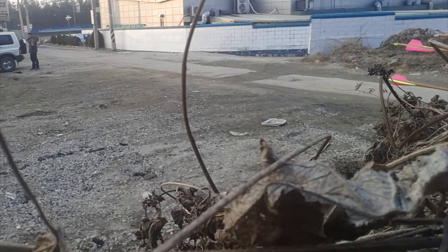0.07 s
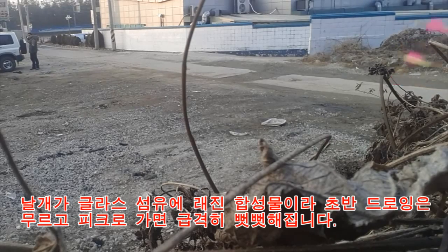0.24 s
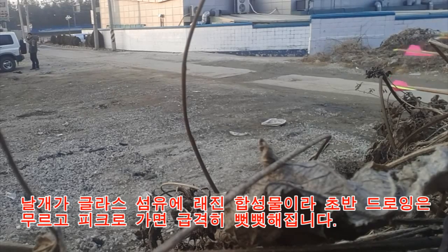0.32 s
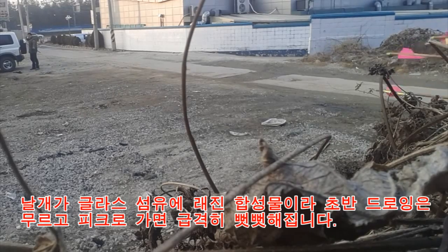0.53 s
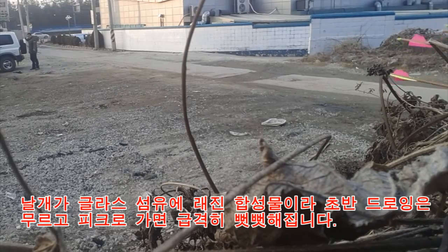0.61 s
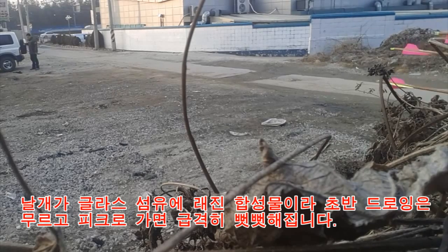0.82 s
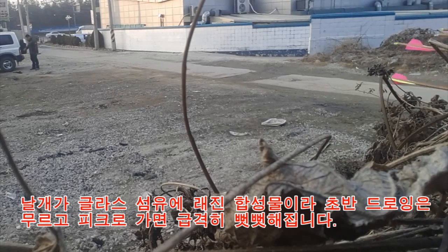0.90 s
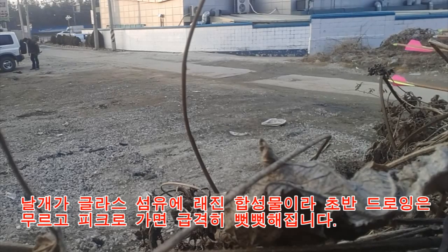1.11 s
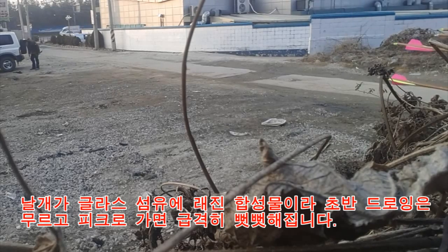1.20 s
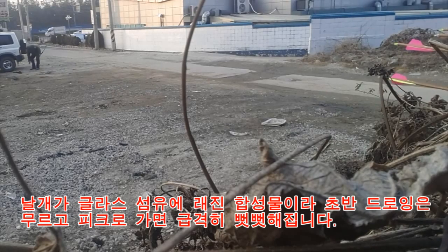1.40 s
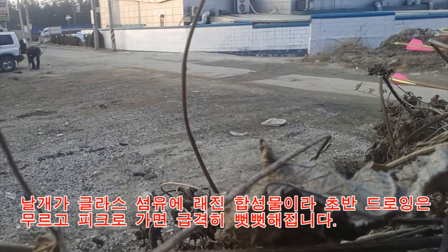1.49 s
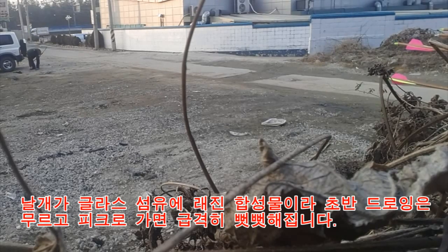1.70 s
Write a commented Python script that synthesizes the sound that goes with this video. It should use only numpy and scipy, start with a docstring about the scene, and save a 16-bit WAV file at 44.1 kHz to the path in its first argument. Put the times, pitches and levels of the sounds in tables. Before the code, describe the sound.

An arrow smacks into a target with a sharp loud crack and short thud outdoors

```python
"""An arrow strikes a target pile near the stereo microphone, in an open gravel yard.
Its contacts are noise bursts with the ringing modes of the shaft; the pile thuds in modes of its own.
Before the hit the fletching hisses louder; after it, ground and walls return scattered noise and slaps.
Late on come faint ticks in a rustle. Behind it all lie distant traffic, in three bands of noise,
and a thin, wavering whine."""
import sys
import numpy as np
from scipy import signal
from scipy.fft import rfft, irfft
from scipy.io import wavfile

SR = 44100
rng = np.random.default_rng(int(sys.argv[2]) if len(sys.argv) > 2 else 0)


def generate_wav(sig):
    """Save sig (samples, or channels by samples) to the path in sys.argv[1] as 16-bit PCM at SR."""
    pcm = np.round(np.clip(np.atleast_2d(sig).T, -1, 1) * 32767).astype(np.int16)
    wavfile.write(sys.argv[1], SR, pcm)


N = 77175  # samples, 1.75 s


def undb(db):
    """Decibels to gain."""
    return 10 ** (np.asarray(db) / 20)


def unit(x):
    """Scale to rms 1."""
    return x / np.sqrt(np.mean(x ** 2))


def since(start_s):
    """Seconds since a moment."""
    return np.arange(N) / SR - start_s


PORT_LAG_S = 0.00028


def ports(start_s):
    """Time since an event at each microphone port; the right one hears it later."""
    return np.array([since(start_s), since(start_s + PORT_LAG_S)])


def pan(db):
    """Left and right gains that differ by db, positive to the left."""
    return undb(np.array([[db], [-db]]) / 2)


def fade(t, t60):
    """Free decay by 60 dB in t60 from t = 0, silent before."""
    decay = np.exp(-np.log(1000) * np.clip(t / max(t60, 1e-4), 0, 10))
    return (t >= 0) * decay


def swell(t, rise_s, t60):
    """Exponential rise up to t = 0, then free decay."""
    rise = np.exp(np.minimum(t, 0) / max(rise_s, 1e-4))
    return np.where(t < 0, rise, fade(t, t60))


def onset(t, rise_s):
    """Straight rise from 0 to 1 that starts at t = 0."""
    return np.clip(t / rise_s, 0, 1)


def colour(x, points, share=1):
    """Filter by (Hz, dB) points on a log-frequency axis; share scales the decibels."""
    hz, db = np.array(points).T
    f = np.maximum(np.fft.rfftfreq(2 * N, 1 / SR), 1)
    gain = undb(share * np.interp(np.log(f), np.log(hz), db))
    return irfft(rfft(x, 2 * N) * gain)[..., :N]


def ring(t, modes):
    """Damped modes struck at t = 0, each cut off after two decay times."""
    out = np.zeros(t.shape)
    for hz, db, t60 in modes:
        live = (t >= 0) & (t < 2 * t60)
        out[live] += undb(db) * np.cos(2 * np.pi * hz * t[live]) * fade(t[live], t60)
    return out


CRACK_RISE_S = 0.00017


def burst(t, t60, hz, octaves, size=2048):
    """A short decaying crunch of noise about a centre frequency, separate at each port."""
    f = np.maximum(np.fft.rfftfreq(size, 1 / SR), 1)
    band = np.exp(-0.5 * (np.log2(f / hz) / octaves) ** 2)
    noise = irfft(rfft(rng.standard_normal((2, size))) * band, size)
    out = np.zeros(t.shape)
    for port in range(2):
        live = np.flatnonzero(t[port] >= 0)[:size]
        shape = onset(t[port, live], CRACK_RISE_S) * fade(t[port, live], t60)
        crunch = shape * noise[port]
        # the crunch gets the energy of its envelope
        out[port, live] = crunch * np.linalg.norm(shape) / np.linalg.norm(crunch)
    return out


def walk(rate, count=64):
    """Slow random drift of rms 1, through `rate` random points a second."""
    return unit(np.interp(since(0) * rate, np.arange(count), rng.standard_normal(count)))


# left over right for sound from the target: pitch_hz, left_minus_right_db
YARD_PAN = [(300, 10.5), (2000, 0), (4400, 6), (6200, 12), (8500, -4), (13000, -3.5)]


def lean(x):
    """Sound from the target reaches the two ports with different colours."""
    left = colour(x[0], YARD_PAN, share=1 / 2)
    right = colour(x[1], YARD_PAN, share=-1 / 2)
    return np.array([left, right])


# relative noise spectrum of distant engine rumble: pitch_hz, level_db (per Hz)
RUMBLE = [(20, -3), (35, -46.5), (55, -4.5), (100, -3), (150, -4), (220, -6.5), (330, -15.5), (600, -23.5),
          (1500, -48)]
# relative noise spectrum of road noise: pitch_hz, level_db (per Hz)
ROAD = [(100, -29), (300, 0), (550, -3.5), (900, -0.5), (1300, -6), (2000, -9.5), (3200, -17.5),
        (6000, -28.5), (14000, -35)]
# relative noise spectrum of the thin hiss: pitch_hz, level_db (per Hz)
AIR = [(1000, 0.5), (3000, -15), (5800, 1), (7000, -4), (8400, -7.5), (11000, -14.5), (14500, -12.5)]
# course of the background before panning: time_s, rumble_db, road_db, air_db
LEVELS = [(0, -45.5, -48.5, -59.5), (.2, -47, -52, -54), (.45, -52, -55, -56.5),
          (0.682, -51.5, -54.5, -55.5), (.86, -54, -58, -64), (1.0, -52.5, -55.5, -61.5),
          (1.12, -49.5, -52, -61), (1.3, -45, -49.5, -62.5), (1.54, -44.5, -48, -61.5),
          (1.61, -49.5, -46.5, -60.5), (1.69, -45, -45, -60), (1.75, -41.5, -45.5, -62)]
# stereo width of the background: pitch_hz, side_over_mid_db
WIDTH = [(100, -23), (200, -18), (380, -8), (700, -5.5), (1300, -2.5), (2500, 0.5), (14000, 0)]
TRAFFIC_PAN_DB = 1.4


def traffic():
    """Engine rumble, road noise and thin hiss; the bass is nearly alike left and right."""
    times, *levels = np.array(LEVELS).T
    out = 0
    for spectrum, db in zip((RUMBLE, ROAD, AIR), levels):
        mid, side = colour(rng.standard_normal((2, N)), spectrum)
        side = colour(side, WIDTH)
        stereo = unit(np.array([mid + side, mid - side]))
        out = out + stereo * undb(np.interp(since(0), times, db))
    return out * pan(TRAFFIC_PAN_DB)


WHINE_HZ, WHINE_WAVER_RMS_HZ, FLUTTER_CUTOFF_HZ = 7720, 70.4, 120
FLUTTER_END_DB, WHINE_DB_PER_S = -67, 10  # flutter level at the end, steady growth


def whine():
    """A thin tone, drifting in pitch and fluttering with slow noise, that steadily grows."""
    phase = 2 * np.pi * np.cumsum(WHINE_HZ + WHINE_WAVER_RMS_HZ * walk(12)) / SR
    slow = signal.butter(2, FLUTTER_CUTOFF_HZ, fs=SR, output="sos")
    flutter = unit(signal.sosfilt(slow, rng.standard_normal((2, N))))
    return flutter * np.sin(phase) * undb(FLUTTER_END_DB + WHINE_DB_PER_S * since(N / SR))


# small ticks, levels before panning: start_s, level_db, pitch_hz, t60_s
TICKS = [(0.9282, -50, 6650, .01), (0.938, -51, 6800, .012), (0.9440, -35.5, 5680, .011),
         (0.9687, -50, 5940, 0.0112)]
TICK_PAN_DB, TICK_RISE_S = 11, 0.00088
TICK_RUSTLE_DB, TICK_RUSTLE_RISE_S, TICK_RUSTLE_T60_S = -62, 0.097, 0.1


def ticks():
    """Light, high damped tones in a faint rustle that peaks at the last tick."""
    taps = 0
    for start_s, db, hz, t60 in TICKS:
        t = ports(start_s)
        taps = taps + ring(t, [(hz, db, t60)]) * onset(t, TICK_RISE_S)
    rustle_shape = swell(since(TICKS[-1][0]), TICK_RUSTLE_RISE_S, TICK_RUSTLE_T60_S)
    rustle = scatter(undb(TICK_RUSTLE_DB) * rustle_shape, FLETCH)
    return pan(TICK_PAN_DB) * (taps + rustle)


YARD_GRAIN_DB = 2.2  # spread of the unevenness before colouring


def scatter(envelope, tone):
    """Dense, uneven noise that is silent until the hit, then follows the envelope."""
    steps_db = YARD_GRAIN_DB * np.repeat(rng.standard_normal(N // 128 + 1), 128)[:N]
    noise = rng.standard_normal((2, N)) * undb(steps_db)
    return unit(colour(noise, tone)) * envelope * (since(HIT_S) > 0)


# clusters from ground and walls, levels before the lean: peak_s, level_db, rise_s, t60_s
ECHOES = [(0.238, -30.5, 0.016, 0.2), (0.255, -38, 0.06, 0.72), (0.329, -37.5, 0.012, 0.17),
          (0.374, -43, .01, 0.19), (0.44, -44, 0.018, 0.062), (0.592, -43, 0.0096, 0.17),
          (0.629, -46, 0.08, 0.26), (0.745, -56.5, 0.092, 0.34)]
# relative tone of the clusters: pitch_hz, level_db
YARD = [(150, -19), (400, -3.5), (900, -2.5), (1500, -12.5), (2200, -10), (3300, -4.5), (4100, -6),
        (4500, -6), (5100, -3), (5850, -1), (6100, -2), (6380, -2), (6900, -1.5), (8500, -5.5),
        (10000, -11.5), (14000, -18)]
# sharp returns from single hard surfaces, before the lean: start_s, level_db, t60_s, pitch_hz
SLAPS = [(0.3324, -35.5, 0.027, 1390), (0.352, -40.5, 0.033, 1830), (0.3707, -38, 0.014, 4430),
         (0.4, -40, .012, 5500), (0.548, -45, 0.016, 5530), (0.5905, -40.5, .02, 2760),
         (0.652, -48, 0.017, 5500)]
SLAP_OCTAVES = 0.5
# relative tone of the returning thud: pitch_hz, level_db
THUD_ECHO = [(90, -22), (140, -9), (210, 5), (300, -6), (380, 2.5), (480, -9), (800, -14), (1500, -32)]
THUD_ECHO_S, THUD_ECHO_DB, THUD_ECHO_RISE_S, THUD_ECHO_T60_S = 0.343, -42, 0.022, 0.29


def yard():
    """Gravel and walls return the crack in clusters and single slaps; the thud comes back once."""
    power = sum((undb(db) * swell(since(s), rise, t60)) ** 2 for s, db, rise, t60 in ECHOES)
    slaps = sum(undb(db) * burst(ports(s), t60, hz, SLAP_OCTAVES) for s, db, t60, hz in SLAPS)
    thud_shape = swell(since(THUD_ECHO_S), THUD_ECHO_RISE_S, THUD_ECHO_T60_S)
    thud = scatter(undb(THUD_ECHO_DB) * thud_shape, THUD_ECHO)
    clusters = scatter(np.sqrt(power), YARD)
    return lean(clusters + slaps) + thud[0] * pan(PILE_PAN_DB)


# relative noise spectrum of the fletching, also lent to the rustle: pitch_hz, level_db (per Hz)
FLETCH = [(1500, -17), (3500, -21.5), (6000, -18.5), (8000, -18.5), (14000, -33)]
FLIGHT_DB, FLIGHT_DB_PER_S, FLIGHT_PAN_DB = -47, 130, 0  # level on reaching the target, growth


def flight():
    """The fletching hisses louder as the arrow nears and stops at the hit."""
    t = since(HIT_S)
    hiss = unit(colour(rng.standard_normal((2, N)), FLETCH))
    approach = undb(FLIGHT_DB + FLIGHT_DB_PER_S * np.minimum(t, 0))
    return pan(FLIGHT_PAN_DB) * hiss * (t < 0) * approach


# pushes by the entry, the slap of the shaft and the rock back: start_s, relative_db, contact_s
BLOWS = [(0.2133, 3.5, 0.0012), (0.2217, -3, 0.0047), (0.237, -8.5, 0.01)]
# modes of the pile, before the bass cut: pitch_hz, relative_db, t60_s
PILE = [(143.6, -23.5, 0.32), (213.5, -15.5, 0.072), (286.4, -13.5, 0.086), (349.7, -22, 0.11),
        (383.7, -18.5, 0.15), (426, -21, 0.094), (606, -3, 0.013), (713, -8.5, 0.026), (748.4, -26, 0.18),
        (980, -13, 0.019), (1093, -23, 0.022)]
PILE_PAN_DB, PILE_LOW_HZ = 3, 162


def pile():
    """Pushes ring the hollow pile, longer contacts more gradually; it radiates no deep bass."""
    thuds = 0
    for start_s, db, contact_s in BLOWS:
        t = ports(start_s)
        thuds = thuds + undb(db) * ring(t, PILE) * onset(t, max(contact_s, 1e-4))
    bass_cut = signal.butter(5, PILE_LOW_HZ, "high", fs=SR, output="sos")
    return signal.sosfilt(bass_cut, thuds) * pan(PILE_PAN_DB)


# sharp contacts of the arrow, levels before tone and lean:
# start_s, noise_db, noise_t60_s, pitch_hz (noise centre), width_octaves, shaft_ring_db, left_minus_right_db
CRACKS = [(0.2134, -10, 0.0056, 2750, 0.91, -2, -2), (0.2148, -16, 0.016, 2830, 1.54, -10, 0.5),
          (0.2220, -6, 0.0075, 5350, 0.93, -16.5, -0.5)]
HIT_S = CRACKS[0][0]
# modes of the shaft: pitch_hz, relative_db, t60_s
SHAFT = [(3364, -11.5, 0.012), (4560, -17.5, 0.0055), (6020, 0, 0.0071), (6325, -6.5, .014)]
# colour of the contacts: pitch_hz, gain_db
CRACK_TONE = [(1000, 1), (1500, -5), (2000, -2), (2400, 4.5), (2800, -2.5), (3400, 4), (4500, 5.5),
              (5200, -1), (6200, -4), (7000, -7.5), (7700, -0.5), (8600, -2.5), (10300, 4), (12000, -3),
              (14500, -8)]


def arrow():
    """Each contact is a burst of crunch plus the short ring of the shaft."""
    out = 0
    for start_s, db, t60, hz, octaves, ring_db, pan_db in CRACKS:
        t = ports(start_s)
        crunch = undb(db) * burst(t, t60, hz, octaves)
        shaft = undb(ring_db) * onset(t, CRACK_RISE_S) * ring(t, SHAFT)
        out = out + pan(pan_db) * (crunch + shaft)
    return lean(colour(out, CRACK_TONE))


def scene():
    """Flight, hit, echoes and background."""
    return flight() + arrow() + pile() + yard() + ticks() + traffic() + whine()


TOP_HZ = 14550


def record(dry):
    """The recorder rounds the loudest peaks and cuts the top."""
    rounded = dry / (1 + dry ** 4) ** 0.25
    top_cut = signal.ellip(10, 0.2, 80, TOP_HZ, fs=SR, output="sos")
    return signal.sosfilt(top_cut, rounded)


dry = scene()
out = record(dry)
generate_wav(out)
```